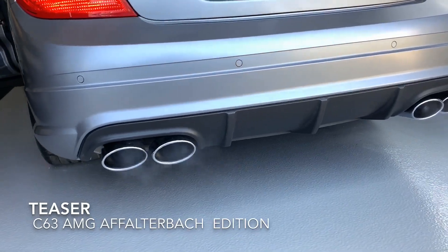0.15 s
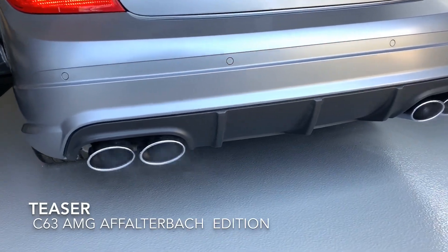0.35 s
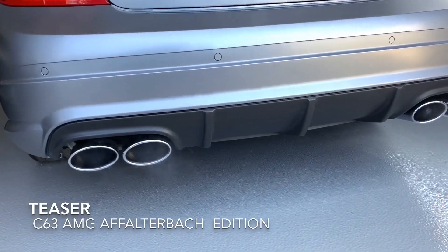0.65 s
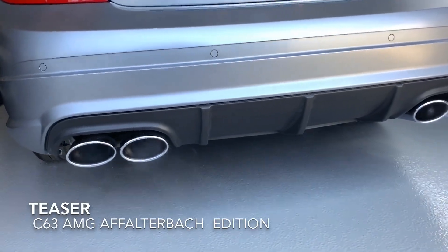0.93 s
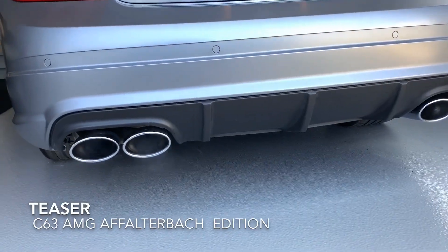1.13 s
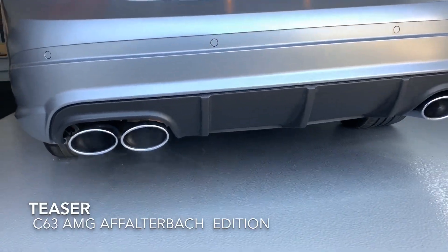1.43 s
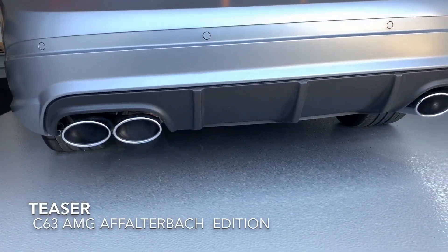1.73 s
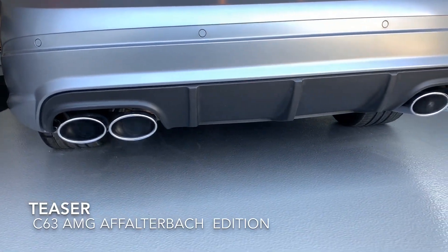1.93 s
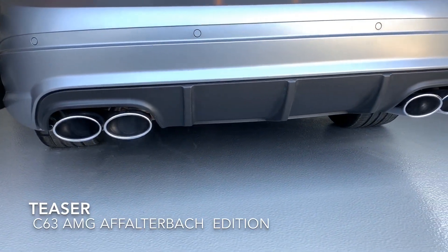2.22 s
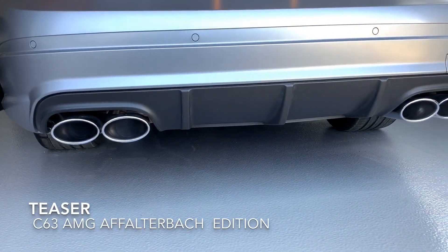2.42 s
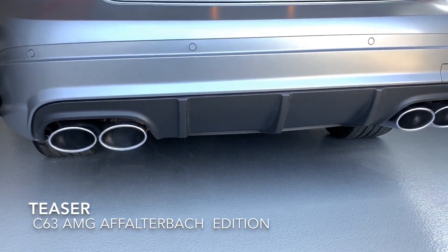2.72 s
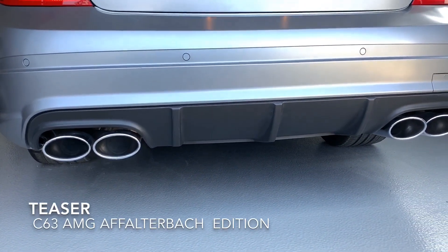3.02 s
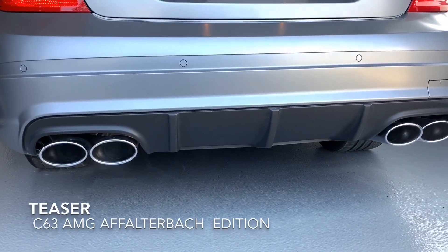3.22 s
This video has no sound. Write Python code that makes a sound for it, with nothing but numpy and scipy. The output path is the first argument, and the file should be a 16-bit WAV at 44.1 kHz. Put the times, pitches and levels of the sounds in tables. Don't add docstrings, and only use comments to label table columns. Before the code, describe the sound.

Close eight-cylinder engine idle drops in pitch, with booming exhaust, hissing puffs and metallic rattle

```python
import sys
import numpy as np
from scipy import signal
from scipy.fft import rfft, irfft, next_fast_len
from scipy.io import wavfile
from scipy.ndimage import uniform_filter1d

SR = 44100
rng = np.random.default_rng(int(sys.argv[2]) if len(sys.argv) > 2 else 0)


def master_out(mix):
    frames = np.transpose(np.atleast_2d(mix))
    ceiling = np.clip(frames, -1, 1)
    pcm = np.round(ceiling * 32767).astype(np.int16)
    wavfile.write(sys.argv[1], SR, pcm)


def gain_from_decibels(decibels):
    exponent = np.asarray(decibels, float) / 20
    return 10 ** exponent


N = 148176
TIP_PHASE = 0.5


def evened(x):
    return x / np.sqrt(np.mean(x ** 2) + 1e-20)


def read(points, hz):
    f, value = np.transpose(points)
    return np.interp(np.log(hz + 1), np.log(f + 1), value)


def drift(rate_hz):
    t = np.arange(N) / SR
    rates = np.geomspace(rate_hz / 8, rate_hz, num=12)
    return evened(sum(np.sin(2 * np.pi * (f * t + rng.random())) for f in rates))


def resonate(x, hz, width):
    turn = np.exp(2j * np.pi * hz * np.arange(len(x)) / SR)
    r = np.exp(-np.pi * width / SR)
    return 2 * (turn * signal.lfilter([1 - r], [1, -r], x / turn)).real


# t/s, firing rate f/Hz, boom level/dB, load level/dB
ENGINE = [(0.0, 66.94, -16.4, -26.4), (0.15, 64.27, -14.9, -25.1), (0.3, 63.04, -13.9, -24.7),
          (0.42, 62.14, -12.7, -24.3), (0.55, 56.74, -12.1, -25.8), (0.68, 54.91, -11.4, -28.5),
          (0.8, 54.75, -11.3, -29.3), (0.95, 52.86, -11.7, -30.1), (1.1, 52.25, -12.3, -30.5),
          (1.3, 50.79, -13.2, -33.1), (1.55, 50.64, -14.0, -32.7), (1.8, 49.57, -14.3, -32.0),
          (2.05, 48.68, -15.3, -33.2), (2.3, 48.97, -14.9, -32.8), (2.55, 47.44, -16.3, -33.4),
          (2.8, 46.34, -16.9, -34.7), (3.05, 46.18, -17.9, -32.2), (3.36, 46.35, -17.5, -32.9)]


def crank():
    start_turns, load_ref_db = 0.28, -33
    s, *columns = np.transpose(ENGINE)
    hz, boom_db, load_db = (np.interp(np.arange(N) / SR, s, c) for c in columns)
    return hz, start_turns + np.cumsum(hz) / SR, boom_db, load_db - load_ref_db


# t/s, level/dB
FLOW = [
    (0, 10),
    (.45, 9),
    (.75, 8),
    (1.0, 5.5),
    (1.3, 2.5),
    (1.8, 1),
    (2.5, 0.5),
    (3.36, -0.5),
]


def gas_flow():
    return np.interp(np.arange(N) / SR, *np.transpose(FLOW))


def clicks(turns, at, sizes, jitter_s):
    k = np.arange(int(turns[-1]))
    place = np.interp(k + at, turns, np.arange(N))
    place = place + jitter_s * SR * rng.standard_normal(len(k))
    out = np.zeros(N)
    out[np.clip(place, 0, N - 1).astype(int)] = sizes(k)
    return out


# f/Hz, level/dB
SECOND_ORDER = [(93, -26.5), (99, -23.5), (107, -21), (113, -24.5), (134, -18.5)]
# f/Hz, level/dB
THIRD_ORDER = [(139, -28), (146, -25), (152, -27), (160, -33.5), (190, -32)]
WOBBLE_DB = [.5, 0.44, 0]
LOPE_DB = [-0.5, -1.54, 1]


def boom(hz, turns, boom_db):
    box_hz, box_width_hz = 55.2, 2.2
    lag = -1.35 - 1.3 * np.arctan((hz - box_hz) / box_width_hz)
    lope = np.cos(2 * np.pi * (turns / 8 - 0.17))
    uneven = 0.09 * drift(12)
    levels = [boom_db, read(SECOND_ORDER, 2 * hz), read(THIRD_ORDER, 3 * hz)]
    out = np.zeros(N)
    for k, (db, wobble, swing) in enumerate(zip(levels, WOBBLE_DB, LOPE_DB)):
        order = k + 1
        level = np.sqrt(2) * gain_from_decibels(db + wobble * drift(14) + swing * lope)
        out += level * np.cos(2 * np.pi * order * turns + lag + order * uneven)
    return out


# f/Hz, level/dB
HISS = [(450, 1), (1400, -4), (2200, -3.5), (3500, -13.5), (5800, -19), (8000, -16), (12000, -22),
        (15500, -25)]
# f/Hz, likeness [0 to 1]
COHERENCE = [(60, 1), (300, .95), (700, .65), (2000, .4), (4500, .5), (6200, .4), (6900, .99),
             (15000, .985)]


def hiss(turns, flow_db):
    hiss_db, flow_share, puff_db, patch_db = -40.5, 0.87, 0.5, 2.5
    frames, hz = N // 128 + 5, np.fft.rfftfreq(512, 1 / SR)
    a, b, c, d, patches = rng.standard_normal((frames, 257, 5)).T
    patches = uniform_filter1d(patches, size=5, axis=0)
    patches = evened(uniform_filter1d(patches, size=9, axis=1))
    same = np.clip(read(COHERENCE, hz), -1, 1)[:, None]
    left = a + 1j * b
    right = same * left + np.sqrt(1 - same ** 2) * (c + 1j * d)
    z = np.array([left, right])
    z *= gain_from_decibels(read(HISS, hz) - 60 * (hz < 120))[:, None] * gain_from_decibels(patch_db * patches)
    noise = evened(signal.istft(z, nperseg=512, noverlap=384)[1][:, :N])
    puff = puff_db * np.cos(2 * np.pi * (turns - TIP_PHASE - 0.08))
    return gain_from_decibels(hiss_db + flow_share * flow_db + puff) * noise


# t/s, f/Hz (not used), level/dB
WHINE = [(0.0, 5390, -63), (0.2, 5402, -53), (0.23, 5413, -65), (0.48, 5429, -49), (0.5, 5423, -62),
         (1.2, 5390, -60), (1.25, 5397, -49.5), (1.37, 5396, -70), (1.5, 5410, -62), (1.57, 5424, -114),
         (1.61, 5419, -68), (1.74, 5418, -43.5), (1.88, 5421, -47), (2.08, 5420, -71), (2.18, 5416, -54.5),
         (2.83, 5412, -49.5), (3.26, 5430, -64), (3.36, 5440, -58)]
# multiple of the tone [1], level/dB
PARTIALS = [(.5, -62), (1.5, -61), (2, -66)]


def whine():
    whine_hz, second_hz = 5417, 4644
    side_phase = 4.3
    s, _, db = np.transpose(WHINE)
    t = np.arange(N) / SR
    turns = np.cumsum(whine_hz + 3.5 * drift(5.7)) / SR
    carrier = np.sin(2 * np.pi * turns + side_phase * np.array([[1], [-1]]))
    uneven_part = uniform_filter1d(gain_from_decibels(np.interp(t, s, db)), size=1500)
    steady = gain_from_decibels(-56 + 1.5 * drift(8)) * np.array([[-1], [1]])
    out = (uneven_part + steady) * carrier
    for multiple, db in PARTIALS:
        out = out + gain_from_decibels(db + 3.0 * drift(9)) * np.sin(2 * np.pi * multiple * turns)
    return out + gain_from_decibels(-69 + 3.2 * drift(5.2)) * np.sin(2 * np.pi * second_hz * t)


# f/Hz, decay T60 t/s, level/dB
LOW_TIPS = [(1016, 0.09, 2.5), (1263, 0.014, 7), (1450, 0.028, 6), (1606, 0.09, 3.5)]
# f/Hz, decay T60 t/s, level/dB
HIGH_TIPS = [(1990, .022, 0), (2950, .015, -6)]
LOW_BY_CYLINDER_DB = [-8, 0, 0, -13, -10, -5, -9, -7]
HIGH_BY_CYLINDER_DB = [0, -9, -14, -4, -16, -3, -16, -6]


def rattle_modes(turns, by_cylinder_db, modes, spread_db):
    def strength(k):
        chance_db = spread_db * rng.standard_normal(len(k))
        return gain_from_decibels(np.array(by_cylinder_db)[k % 8] + chance_db)

    out = np.zeros(N)
    for hz, t60, db in modes:
        x = clicks(turns, TIP_PHASE, strength, jitter_s=0.000826)
        ringing = resonate(x, hz, 1.7 / t60)
        out += gain_from_decibels(db) * evened(resonate(ringing, hz, 600))
    return evened(out)


def rattle(turns, flow_db):
    low = rattle_modes(turns, LOW_BY_CYLINDER_DB, LOW_TIPS, spread_db=3.5)
    high = rattle_modes(turns, HIGH_BY_CYLINDER_DB, HIGH_TIPS, spread_db=2.2)
    return gain_from_decibels(-51 + flow_db) * low + gain_from_decibels(-47.5 + 0.3 * flow_db) * high


PUSH = [-0.88, 0.69, 0.62, -0.66, 0.8, -0.96, -1, 0.39]
# f/Hz, bandwidth f/Hz, level/dB, share of load [dB per dB]
PIPE = [(40, 21, -7, 1.8), (88.1, 26, -6.5, 1.26), (145, 22, -2.5, 1.45), (213, 45, -8, 1.38),
        (259.7, 22.6, -5.5, 1.69), (287, 64, -5.5, .9), (341.8, 36.7, -1.5, 1.16), (399, 15.7, -14.5, 1.76)]


def burble(turns, load_db):
    push = np.array(PUSH)
    push = push - push.mean()

    def strength(k):
        return push[k % 8] + 0.15 * rng.standard_normal(len(k))

    x = evened(clicks(turns, 0.75, strength, jitter_s=0.0003))
    x = x + 0.22 * rng.standard_normal(N)
    rung = np.zeros(N)
    for k, (hz, width, db, share) in enumerate(PIPE):
        mode = evened(resonate(resonate(x, hz, width), hz, 2 * width))
        rung += (-1) ** k * gain_from_decibels(db + (share - 1.5) * load_db) * mode
    low_pass = signal.butter(6, 449, fs=SR, output="sos")
    return gain_from_decibels(-30 + load_db) * evened(signal.sosfilt(low_pass, rung))


def garage(x):
    t60_s, size = 0.25, SR // 2
    taps = np.zeros((2, size))
    at = np.arange(200, size - 20, 20) + rng.integers(0, 20, (2, (size - 201) // 20))
    np.put_along_axis(taps, at, rng.choice([-1., 1.], at.shape), 1)
    taps *= gain_from_decibels(-60 * np.arange(size) / SR / t60_s)
    return signal.fftconvolve(x[None], taps / np.linalg.norm(taps[0]), axes=1)[:, :N]


# t/s, level/dB, f/Hz
KNOCKS = [(0.017, -21.5, 1445), (0.143, -21, 1235), (0.187, -19.5, 1080), (0.268, -19, 1450),
          (0.379, -23, 1230), (0.409, -12, 1450), (0.442, -21.5, 1170), (0.631, -19.5, 1450),
          (0.665, -21, 1206), (0.685, -19.5, 780), (0.83, -26, 1030), (0.885, -18.5, 1465),
          (0.962, -33, 1270), (1.133, -26, 1280), (1.286, -25, 1570), (1.406, -31, 2015),
          (1.603, -23, 1340), (1.723, -20.5, 2010), (1.924, -35, 1250), (2.046, -26.5, 1600),
          (2.396, -26, 1440)]


def knocks():
    t60_s, rise_s = 0.03, 0.002
    out, t = np.zeros(N), np.arange(2000) / SR
    for s, db, hz in KNOCKS:
        envelope = gain_from_decibels(db - 1 - 60 * t / t60_s) * np.minimum(t / rise_s, 1)
        out[round(s * SR):][:2000] += envelope * np.sin(2 * np.pi * hz * t)
    return out


def scene():
    hz, turns, boom_db, load_db = crank()
    flow_db = gas_flow()
    tips = rattle(turns, flow_db) + knocks()
    pipes = burble(turns, load_db)
    direct = boom(hz, turns, boom_db) + hiss(turns, flow_db) + whine() + tips + pipes
    return direct + gain_from_decibels(-11) * garage(tips) + gain_from_decibels(-18) * garage(pipes)


def band_limit(x):
    return signal.sosfilt(signal.butter(12, 15690, fs=SR, output="sos"), x)


# f/Hz, level/dB
PORT_LEVEL = [(60, -.6), (150, -.9), (350, 0), (1300, 3), (2800, 1.7), (5500, -2.7), (7000, 0), (15000, 0)]
# f/Hz, phase [rad]
PORT_PHASE = [(0, 0), (1460, -.2), (2580, -3.6), (3360, -3.4), (5420, -8.6), (7400, -12.57), (10550, -15.7),
              (13700, -18.85), (15700, -21)]


def record(dry):
    low_cut_hz, knee = 33, 1.1
    size = next_fast_len(N + 2048)
    hz = np.fft.rfftfreq(size, 1 / SR)
    phase = np.interp(hz, *np.transpose(PORT_PHASE))
    half = gain_from_decibels(read(PORT_LEVEL, hz) / 2) * np.exp(0.5j * phase)
    cut = np.minimum(hz / low_cut_hz, 1) ** 3
    spectrum = rfft(knee * np.tanh(dry / knee), size)
    mix = irfft(spectrum * cut * np.array([half, 1 / half]), size)[:, :N]
    return band_limit(mix)


dry = scene()
out = record(dry)
master_out(out)
```